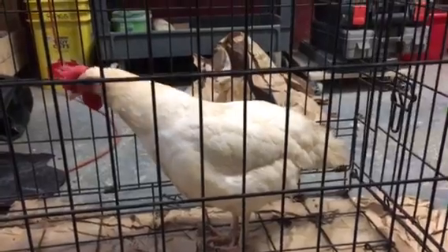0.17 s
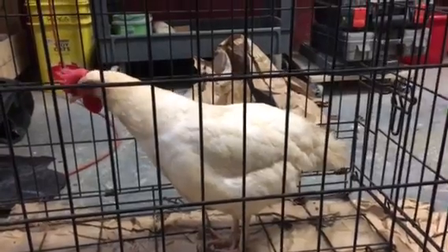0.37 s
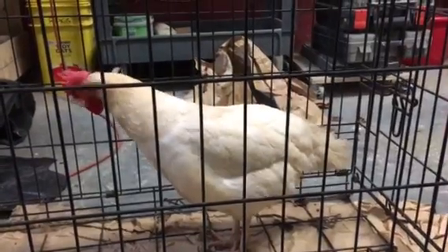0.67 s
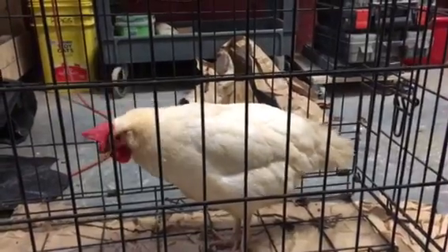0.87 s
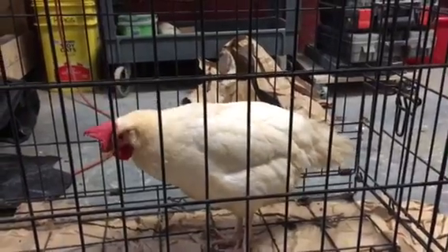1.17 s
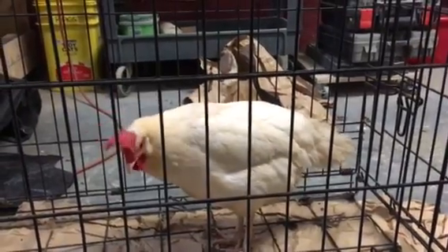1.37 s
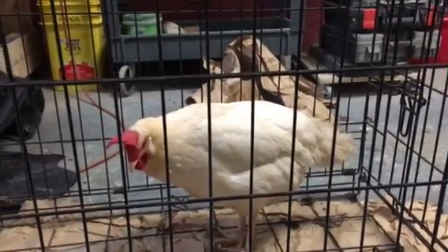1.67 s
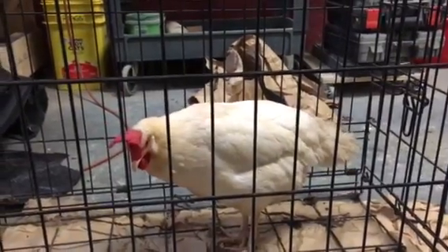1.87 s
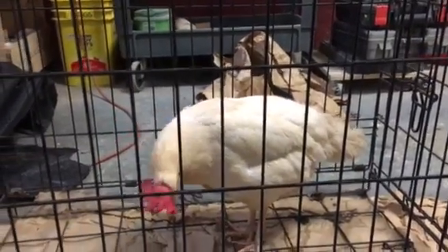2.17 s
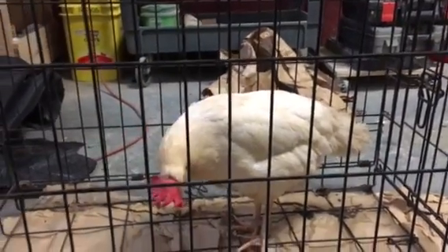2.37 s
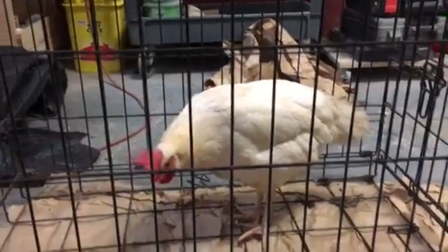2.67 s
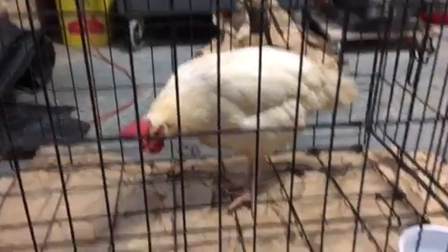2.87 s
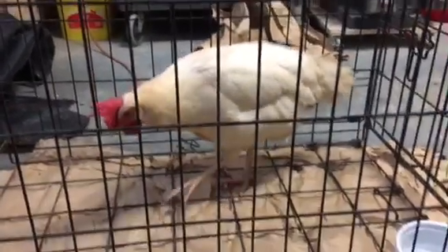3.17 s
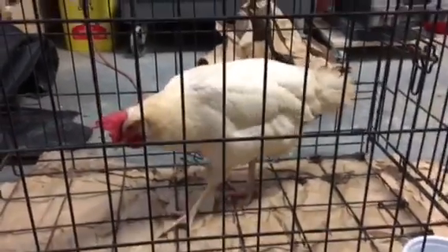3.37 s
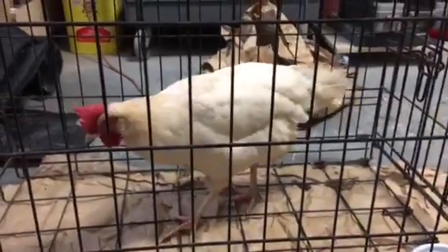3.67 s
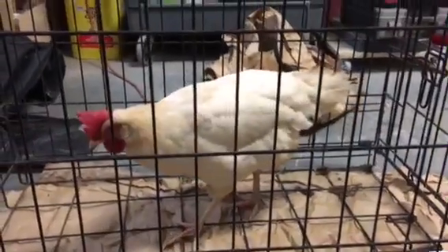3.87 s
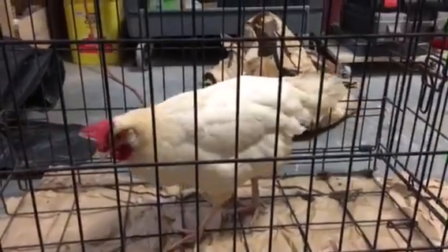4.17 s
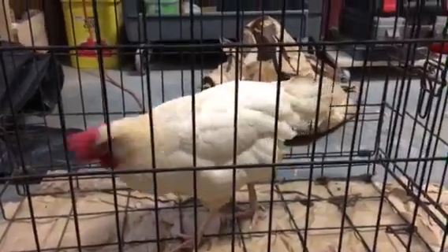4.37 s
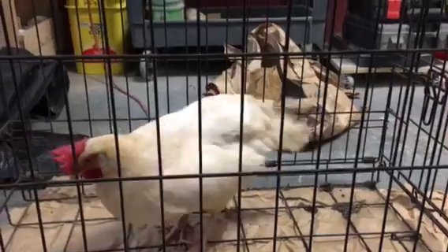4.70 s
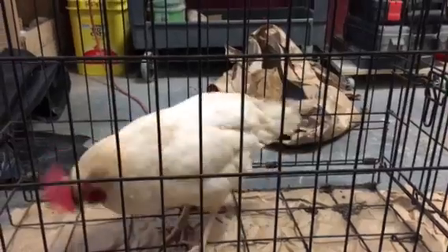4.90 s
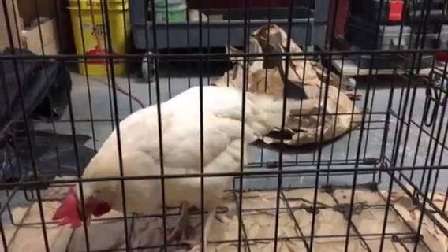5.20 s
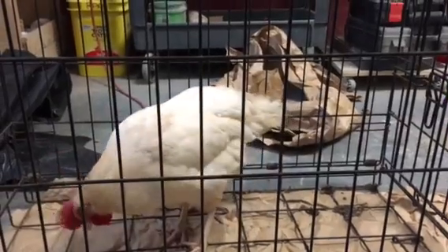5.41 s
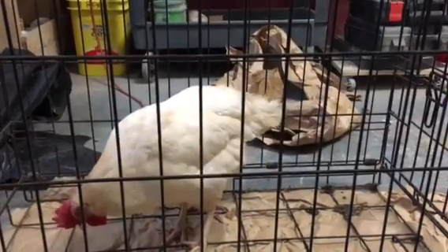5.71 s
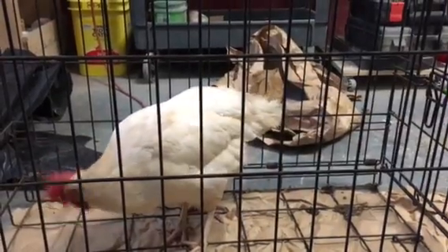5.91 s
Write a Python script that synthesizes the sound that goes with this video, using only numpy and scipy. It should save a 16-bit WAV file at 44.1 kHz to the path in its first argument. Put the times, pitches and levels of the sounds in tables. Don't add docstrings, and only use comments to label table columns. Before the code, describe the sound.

Low, slowly beating motor hum and steady hiss fill a garage. Close by, a hen makes four mellow clucks, then paper creases snap. Distant, echo-blurred chirping phrases begin as her feet scrape, rustle and tick across paper and wire. Bursts of clicks lead to one hard plastic-tray knock with rattling rebound and a short room tail, then thinning light clicks. Phone microphone near the cage.

```python
import sys
import numpy as np
from scipy import signal
from scipy.fft import rfft, irfft, next_fast_len
from scipy.io import wavfile
from scipy.ndimage import uniform_filter1d, map_coordinates

SR = 44100
rng = np.random.default_rng(int(sys.argv[2]) if len(sys.argv) > 2 else 0)


def invert_db(x):
    u = np.asarray(x, float) / 20
    return 10 ** u


def wav_record(signal):
    frames = np.transpose(np.atleast_2d(signal))
    bounded = np.clip(frames, -1, 1)
    quanta = np.round(bounded * 32767).astype(np.int16)
    wavfile.write(sys.argv[1], SR, quanta)


N = 266805

# weaker line in Hz, its level in dB, stronger line in Hz,
# time in seconds when both are in step.
MOTOR_LINES = [
    (55.43, -4, 59.19, 1.38),
    (120.05, -5, 118.37, .4),
]
# time in seconds, shaft level in dB.
MOTOR_LOAD = [
    (0, -63),
    (3.5, -59),
    (4.5, -61.5),
    (6.05, -63),
]
# frequency in Hz, density in dB per Hz.
AIR_SPECTRUM = [(15, -51.5), (25, -18.5), (36, -14.5), (60, -3.5), (74, -8.5), (86, -13.5), (123, -12.5),
                (146, -19), (173, -22), (1500, -39.5), (1950, -76.5), (3300, -120)]
# frequency in Hz, density in dB per Hz.
HISS_SPECTRUM = [(900, -33.5), (1500, -2), (2400, -1.5), (4000, -4), (4600, -8), (4950, -10.5), (5500, -4),
                 (6500, -4), (8000, -9.5), (9100, -3.5), (12000, -2.5), (15700, -2)]
# peak in seconds, level in dB,
# pitch in Hz, rise in seconds, fall in seconds.
CLUCK_PUSHES = [
    [(.013, -39.5, 926.4, 0.015, 0.029), (.038, -40, 951, 0.0089, 0.03)],
    [(.373, -51.5, 870, .01, 0.0089), (.398, -41.5, 804, 0.028, 0.02)],
    [(.585, -41, 846, .011, 0.019), (.614, -38, 934, 0.013, 0.016)],
    [(.827, -38, 949, 0.014, 0.035), (.858, -43, 1058, 0.015, 0.012), (.873, -50, 996, 0.013, .012)],
]
# start in seconds, peak in dB, crackle in dB, sheet ring in Hz.
CREASE_SNAPS = [(.138, -51, -32, 2480), (.7127, -48, -30, 2920), (.9134, -52.5, -16, 2980),
                (1.0246, -36.5, -8.5, 2900), (1.162, -52.5, -10, 1850), (2.2301, -55.5, -26, 2850),
                (4.2896, -58, -19.5, 2980), (4.5675, -37.5, -19, 1870), (4.779, -30.5, -15, 1260),
                (4.8737, -43.5, -1.5, 3940), (4.99, -55, -3, 3070), (5.0538, -58, -13, 3730),
                (5.0762, -55, -4, 4130), (5.133, -52, -12, 3560), (5.221, -53.5, -3, 3950),
                (5.8098, -64, -14, 3130), (5.9247, -55.5, -18, 2740), (6.0276, -50.5, -11.5, 2554)]
# start in seconds, peak in dB, crackle in dB.
WIRE_TICKS = [(.314, -82, 15), (0.611, -79, 14), (.808, -58.5, -7.5), (.979, -71, 11), (2.241, -58.5, -5),
              (2.61, -70.5, 14.5), (3.549, -62, 7), (3.604, -61, -3), (3.709, -51, 6.5), (4.234, -58.5, -6),
              (4.404, -61.5, -3), (4.582, -53, 5), (4.608, -41.5, 4.5), (4.822, -50, 5), (5.099, -62, -1),
              (5.16, -58, -8), (5.1973, -57.5, -6), (5.339, -61, -5)]
# peak in seconds, peak in dB, crackle in dB,
# sheet ring in Hz, swell in seconds.
SCRAPE_SLIPS = [(.795, -55, -21, 2700, .0046), (.943, -45.5, -1, 3100, .008),
                (2.998, -30.5, -3, 3700, .005), (3.009, -39.5, -4, 3030, .0037),
                (3.05, -39.5, -2, 6000, .009), (3.069, -42, -4, 3150, .008), (3.634, -57, 11, 4000, .003),
                (3.642, -33.5, -7, 3820, .0038), (3.765, -35.5, -9.5, 3660, .0043),
                (4.506, -50, -4.5, 2380, .0059), (4.518, -48.5, -5.5, 2387, .005),
                (4.546, -42, -8.5, 4220, .011), (4.59, -41.5, -12.5, 3237, .0034),
                (4.615, -27.5, -5, 3440, .0053), (4.622, -34.5, -2, 2140, .0053),
                (4.633, -47, 3, 2040, .0053)]
# start in seconds, peak in dB, crackle in dB, sheet ring in Hz.
TOE_STAMPS = [
    (.964, -72, -8, 2270),
    (1.0447, -58, -7, 1780),
    (1.407, -59.5, -27, 1630),
    (2.095, -57.5, -24, 2270),
    (3.1033, -36, -3.5, 2520),
    (3.1184, -46, -5, 2900),
    (3.6878, -38, -5, 1050),
    (5.6547, -62, -1, 2120),
]
# start in seconds, peak in dB, crackle in dB,
# sheet ring in Hz.
CLAW_CLICKS = [
    (1.441, -41.5, -26, 2740),
    (3.4096, -36.5, -2, 2500),
    (3.4986, -24, -23, 3090),
    (3.7169, -42.5, -11, 3180),
    (5.1126, -48, -8, 3640),
    (5.273, -55, .5, 3230),
    (5.4389, -50.5, -19, 3780),
    (5.4777, -46.5, -2.5, 2420),
    (5.571, -48, 1, 3140),
]
# peak in seconds, rustle in dB, crackle over it in dB,
# rise in seconds, fall in seconds.
PAPER_DRAGS = [(1.0, -75.5, -11, .25, .2), (2.99, -51, -5, .09, 0.045), (3.055, -53, 0, .05, 0.035),
               (3.1, -60.5, -13, .02, 0.11), (3.411, -54, -7.5, .01, 0.13), (3.53, -72, -19, .08, 0.08),
               (3.65, -60.5, -1.5, .06, .15), (3.74, -61, -3.5, .15, 0.071), (4.54, -57, -7.5, .09, .1),
               (4.59, -52.5, -12.5, .08, .02), (4.625, -56.5, -2, .03, .07),
               (4.849, -56.5, -6.5, .07, 0.12), (5.02, -67.5, 1, .3, .4)]
# frequency in Hz, density in dB per Hz.
SHEET_SPECTRUM = [(200, -28.5), (500, -11), (1100, -10), (2200, -4.5), (3500, -2), (5000, -11.5),
                  (7000, -12.5), (10000, -52)]
# start within the phrase in seconds, length in seconds,
# first pitch in Hz, last pitch in Hz, level in dB.
WREN_SLURS = [
    (0, .017, 4495, 4495, -5),
    (0.014, .018, 3732, 4864, 1),
    (0.032, .011, 4860, 3797, -2.5),
    (.082, .034, 2860, 3290, 2.5),
    (0.148, .06, 2131, 1797, -8.5),
    (.222, 0.016, 2326, 2490, 1),
    (0.237, .035, 2506, 2780, -1.5),
]
# start in seconds, level in dB.
WREN_PHRASES = [
    (2.125, -68),
    (2.438, -65.5),
    (2.756, -64),
    (3.086, -65),
    (3.421, -65.5),
    (3.76, -66.5),
    (4.098, -65.5),
    (4.44, -66),
]
# start in seconds, length in seconds, first pitch in Hz,
# last pitch in Hz, level in dB.
WIRE_SQUEAKS = [
    (2.92, 0.087, 1095, 1140, -66),
    (4.626, .02, 1988, 2180, -53.5),
]
# start in seconds, peak in dB, pitch in Hz.
TRAY_FLEX = [
    (2.995, -46.5, 213),
    (3.108, -49, 318),
    (3.416, -44.5, 208),
    (3.502, -51, 200),
    (3.691, -51, 966),
    (3.764, -41.5, 265),
    (4.542, -51, 262),
    (4.575, -46.5, 597),
]
# start in seconds, peak in dB, crackle in dB, ring in Hz.
TRAY_SLAM = [
    (4.6756, -24.5, -12, 2995),
    (4.678, -21, -10, 1612),
    (4.681, -14.5, 0, 5000),
    (4.6826, -12, -20, 3440),
    (4.6876, -21.5, 5, 3930),
    (4.705, -17, -15.5, 3350),
]
# frequency in Hz, t60 in seconds.
CAGE_DECAY = [(300, 0.049), (1000, 0.26), (4000, 0.03), (12000, 0.021)]
# frequency in Hz, t60 in seconds.
GARAGE_DECAY = [(150, 0.24), (900, 0.87), (3000, 0.58), (8000, 0.24), (15000, 0.12)]
# frequency in Hz, t60 in seconds.
YARD_DECAY = [(2000, 0.67), (4500, 0.62)]
# frequency in Hz, gain in dB.
MIC_RESPONSE = [(20, 0), (9300, 0), (10400, -4), (11500, 0), (15700, 0), (15900, -24), (16500, -28),
                (16650, -120)]


def unit(x):
    return x / np.sqrt(np.mean(x ** 2) + 1e-20)


def along(points, hz):
    f, v = np.transpose(points)
    return np.interp(np.log(hz + 1), np.log(f + 1), v)


def wobble(rate):
    knots = rng.standard_normal(int(N * rate / SR) + 4)
    return map_coordinates(knots, [np.arange(N) * rate / SR])


def coloured(spectrum):
    m = next_fast_len(N + 8192)
    gain = invert_db(along(spectrum, np.fft.rfftfreq(m, 1 / SR)))
    return irfft(rfft(rng.standard_normal(m)) * gain, m)[:N]


def band(x, lo_hz, hi_hz, order=2):
    edges = [lo_hz, min(hi_hz, SR * .45)]
    return signal.sosfilt(signal.butter(order, edges, "bandpass", fs=SR, output="sos"), x)


def add(track, s, sound):
    part = track[..., max(round(s * SR), 0):][..., :len(sound)]
    part += sound[:part.shape[-1]]


def swell(t, peak, rise, fall):
    return np.where(t < peak, (peak - t) / rise, (t - peak) / fall)


def whistle(rows, second_db):
    s, hz, db = np.transpose(rows)
    t = np.arange(s[0], max(s), 1 / SR)
    glide = uniform_filter1d(np.interp(t, s, hz), size=60)
    turn = 2 * np.pi * np.cumsum(glide) / SR
    fade = np.minimum(1, np.minimum(t - t[0], t[-1] - t) / 0.0016)
    level = invert_db(uniform_filter1d(np.interp(t, s, db), size=130))
    return np.sqrt(2) * fade * level * (np.sin(turn) + invert_db(second_db) * np.sin(2 * turn))


def echo(x, decays, delay, blocks):
    out = np.zeros(N + 2 * SR)
    for part in np.array_split(np.arange(N), blocks):
        hz, t, z = signal.stft(rng.standard_normal(SR), SR, nperseg=256)
        decay = invert_db(-60 * t / along(decays, hz)[:, None])
        tail = signal.istft(z * decay, SR, nperseg=256)[1]
        add(out, part[0] / SR + delay, signal.fftconvolve(x[part], tail / np.linalg.norm(tail)))
    return out[:N]


def motors():
    second_db, second_follows = -70, .4
    t = np.arange(N) / SR
    shaft_db = np.interp(t, *np.transpose(MOTOR_LOAD))
    levels = shaft_db, second_db + second_follows * (shaft_db - shaft_db.mean())
    hum = 0
    for (weak_hz, weak_db, hz, in_step), db in zip(MOTOR_LINES, levels):
        turn = 2 * np.pi * (t - in_step)
        weak = invert_db(weak_db + .8 * wobble(0.76)) * np.cos(weak_hz * turn)
        hum = hum + invert_db(db) * unit(np.cos(hz * turn) + weak)
    return hum


def air_and_hiss():
    air_db, hiss_db = -76, -73
    air = coloured(AIR_SPECTRUM)
    air *= invert_db(air_db + 0.55 * wobble(2.2)) / np.std(band(air, 250, 1500))
    return air + invert_db(hiss_db) * unit(coloured(HISS_SPECTRUM))


def hen():
    drop_db, roundness = 19, 1.76
    track, flutter_db = np.zeros(N), 1.3 * wobble(130)
    for pushes in CLUCK_PUSHES:
        peak, db, hz, rise, fall = np.transpose(pushes)[..., None]
        t = np.arange(max((peak - rise).min(), 0), (peak + fall).max(), 1 / 2000)
        push_db = db - drop_db * swell(t, peak, rise, fall) ** roundness
        power = invert_db(2 * push_db) + 1e-30
        total = power.sum(0)
        pitch = (power * hz).sum(0) / total
        level_db = 10 * np.log10(total) + flutter_db[(t * SR).astype(int)]
        add(track, t[0], whistle(np.transpose([t, pitch, level_db]), second_db=-31.5))
    return track


def kind(rows, thud_db, t60):
    return [(s, db, thud_db, crackle_db, hz, t60) for s, db, crackle_db, hz in rows]


def snaps(events, swelling=False):
    track, t = np.zeros((2, N)), np.arange(SR // 16) / SR
    for s, db, thud_db, crackle_db, hz, length in events:
        lead = 3 * length if swelling else 0
        t60 = .012 if swelling else max(length, .003)
        rise = np.exp((t - lead) / length * 2.3)
        shape = np.where(t < lead, rise, invert_db(-60 * (t - lead) / t60))
        push = rng.standard_normal((3, len(t))) * shape * (1 - np.exp(-t / 0.00013))
        blow = 1. * (np.arange(len(t)) == round(lead * SR))
        sheet = band(push[0], hz * .91, hz * 1.1) + .9 * band(push[0], hz * 0.85, hz * 1.3, order=1)
        layers = [  # (rough sound, clean blow, level in dB)
            (sheet, band(blow, hz * 0.51, hz * 1.4, order=1), 0),
            (band(push[1], 390, 1500), band(blow, 390, 1500), thud_db - 0.5),
            (band(push[2], 5500, 16000, order=1), band(blow, 5500, 16000, order=1), crackle_db + 5.0)]
        for sound, clean, rel_db in layers:
            sound = sound * invert_db(db + rel_db) / np.abs(sound).max()
            add(track[0], s + 0.00056 - lead, sound)
            add(track[1], s + .0005 - lead, clean * np.linalg.norm(sound) / np.linalg.norm(clean))
    return track


def claws():
    sudden = kind(CLAW_CLICKS, thud_db=-18, t60=0.0072)
    sudden += kind(CREASE_SNAPS, thud_db=-9.5, t60=0.016)
    sudden += kind(TOE_STAMPS, thud_db=3, t60=0.013)
    wire_hz = 5300
    sudden += kind([(*row, wire_hz) for row in WIRE_TICKS], thud_db=-28.5, t60=0.011)
    scrape_thud_db = -19.5
    scrapes = [(s, db, scrape_thud_db, *rest) for s, db, *rest in SCRAPE_SLIPS]
    return snaps(sudden) + snaps(scrapes, swelling=True)


def paper():
    drop_db = 21.5
    t = np.arange(N) / SR
    slow = t[::64]
    power = np.zeros((2, len(slow)))
    for s, db, crackle_db, rise, fall in PAPER_DRAGS:
        drag = invert_db(db - drop_db * swell(slow, s, rise, fall))
        power += np.square([drag, drag * invert_db(crackle_db)])
    rustle, crackle = [np.interp(t, slow, gain) for gain in np.sqrt(power)]
    clumps = invert_db(3 * wobble(140) + 4.5 * wobble(500))
    body = unit(clumps * coloured(SHEET_SPECTRUM))
    grain = np.sqrt(clumps) * invert_db(1.3 * wobble(300))
    fizz = unit(grain * band(rng.standard_normal(N), 5000, 15500))
    return rustle * body + crackle * fizz


def wren():
    track = np.zeros(N)
    edge_db, edge = -2, .3
    share = np.array([0, edge, 1 - edge, 1])
    soft_db = edge_db * np.array([1, 0, 0, 1])
    for s, db in WREN_PHRASES:
        slower = 1 + 0.03 * (s - WREN_PHRASES[0][0])
        for start, length, from_hz, to_hz, note_db in WREN_SLURS:
            hz = (from_hz + (to_hz - from_hz) * share) * (1 + 0.01 * rng.standard_normal())
            sung = np.transpose([share * length * slower, hz, note_db + soft_db])
            add(track, s + start * slower, invert_db(db) * whistle(sung, second_db=-47.0))
    early = echo(track, YARD_DECAY, delay=.002, blocks=21)
    late = echo(track, YARD_DECAY, delay=0.037, blocks=11)
    return invert_db(-11.5) * track + early + invert_db(-8.5) * late


def squeaks():
    track = np.zeros(N)
    for s, length, from_hz, to_hz, db in WIRE_SQUEAKS:
        middle = (length / 3, (from_hz + to_hz) / 2, db)
        rows = [(0, from_hz, db - 9), middle, (length, to_hz, db - 7.5)]
        add(track, s, whistle(rows, second_db=-14))
    return track * invert_db(4 * wobble(160))


def steps():
    track, t = np.zeros(N), np.arange(SR // 5) / SR
    for s, db, hz in TRAY_FLEX:
        decay = invert_db(db - 60 * t / 0.035) * (1 - np.exp(-t / 0.0013))
        add(track, s, decay * np.sin(2 * np.pi * hz * t))
    return track


def tray():
    t = np.arange(SR // 2) / SR
    decay = invert_db(-60 * t / 0.12) + invert_db(-15.0 - 60 * t / 1.0)
    onset = 1 - np.exp(-(t / 0.014) ** 2)
    shudder = band(rng.standard_normal(len(t)), 110, 300) * decay * onset
    clatter = band(rng.standard_normal(len(t)), 680, 8700, order=1) * invert_db(-60 * t / 0.27)
    track = snaps(kind(TRAY_SLAM, thud_db=-19.5, t60=0.0083))
    impulse = 1. * (t == 0)
    add(track, TRAY_SLAM[2][0], invert_db(3.5) * band(impulse, 2500, 13000))
    add(track, 4.689, invert_db(-4.5) * band(impulse, 3500, 14000))
    add(track[0], TRAY_SLAM[0][0], invert_db(-18.5) * shudder + invert_db(-23.5) * clatter)
    return track


def scene():
    voice, (slam, bang) = hen(), tray()
    feet, blows = claws() + paper() + steps() + squeaks()
    late_voice = np.roll(voice, round(.02 * SR))
    to_cage = invert_db(-21.5) * late_voice + invert_db(-10) * blows + invert_db(-7) * bang
    to_garage = invert_db(-21.0) * voice + invert_db(-13.5) * blows + invert_db(-12.5) * bang
    near = echo(to_cage, CAGE_DECAY, delay=.003, blocks=30)
    room = echo(to_garage, GARAGE_DECAY, delay=0.011, blocks=20)
    return (voice + feet + slam + near + room + wren() + motors() + air_and_hiss())[None]


def low_pass(x):
    return signal.sosfilt(signal.butter(12, 16870, fs=SR, output="sos"), x)


def record(dry):
    gain = invert_db(along(MIC_RESPONSE, np.fft.rfftfreq(N, 1 / SR)))
    heard = irfft(rfft(dry) * gain, N)
    return low_pass(heard)


dry = scene()
out = record(dry)
wav_record(out)
```